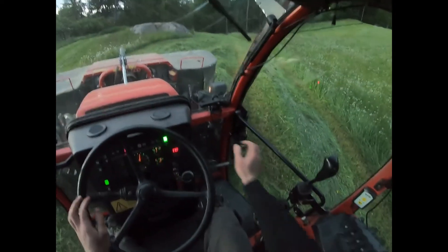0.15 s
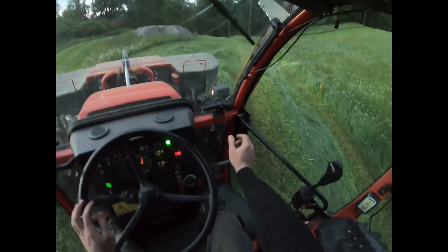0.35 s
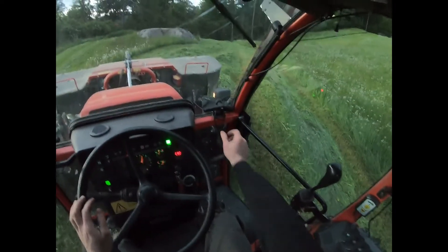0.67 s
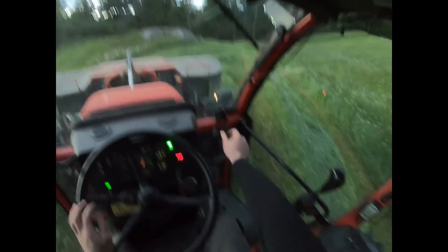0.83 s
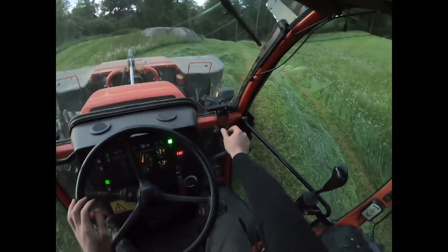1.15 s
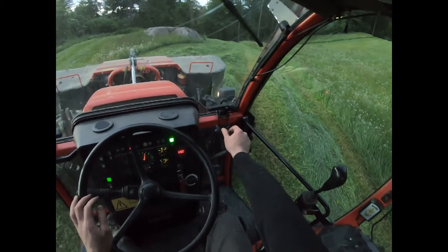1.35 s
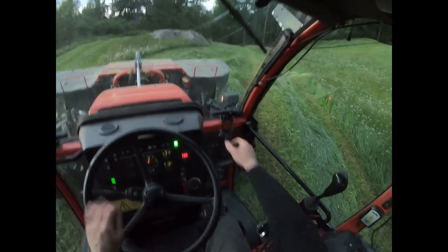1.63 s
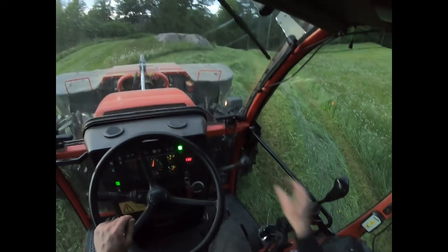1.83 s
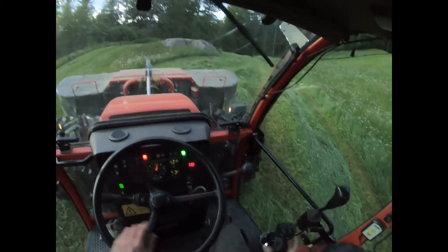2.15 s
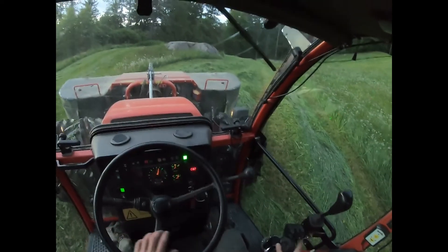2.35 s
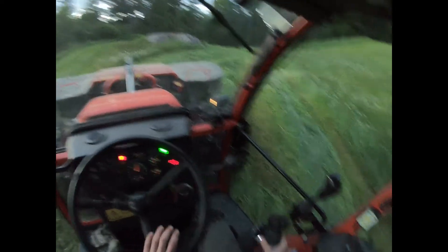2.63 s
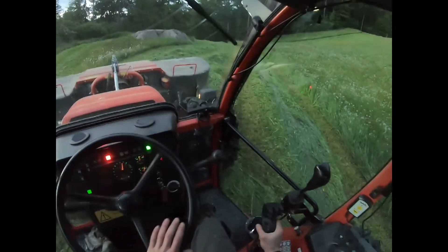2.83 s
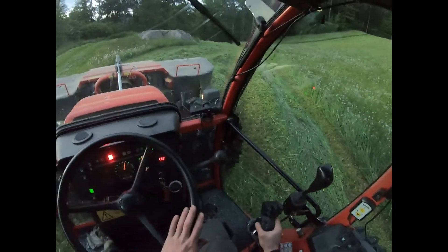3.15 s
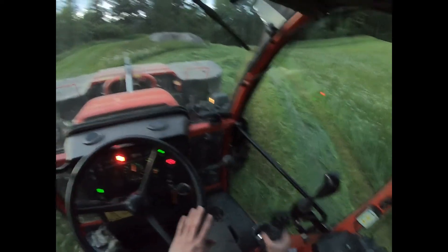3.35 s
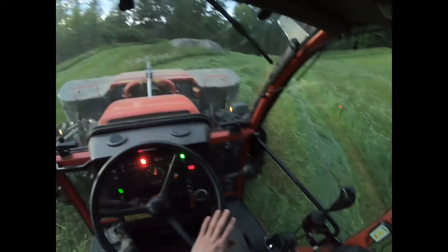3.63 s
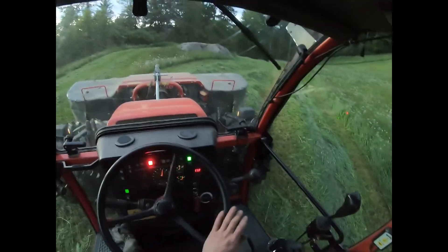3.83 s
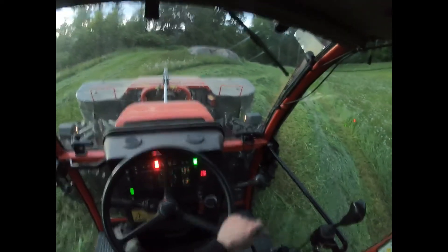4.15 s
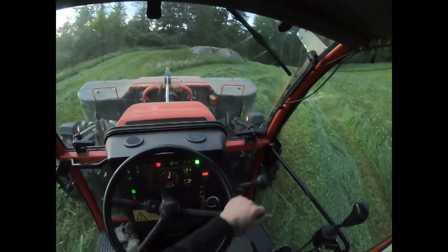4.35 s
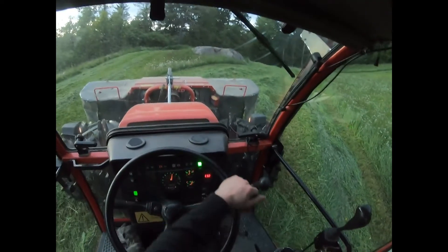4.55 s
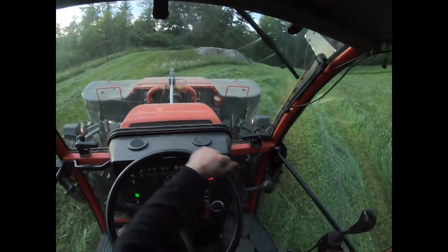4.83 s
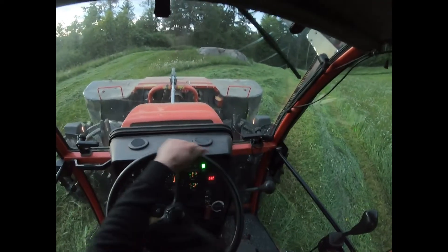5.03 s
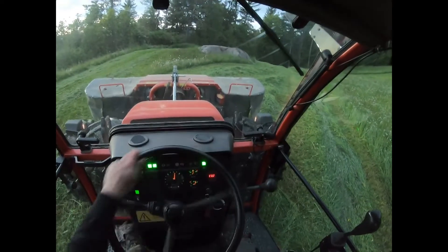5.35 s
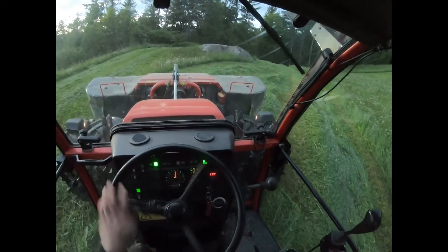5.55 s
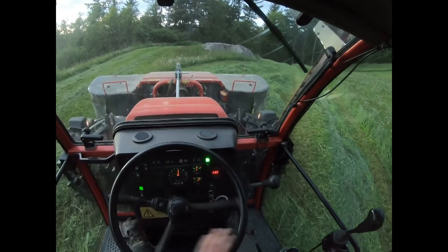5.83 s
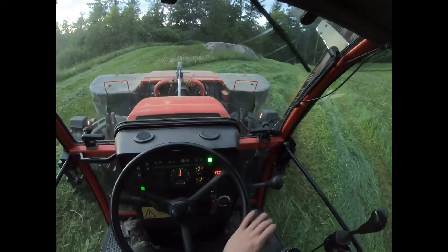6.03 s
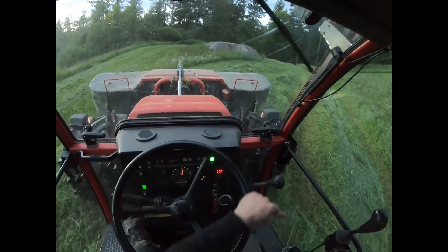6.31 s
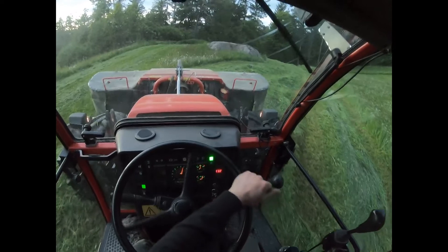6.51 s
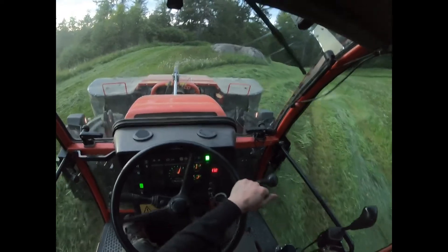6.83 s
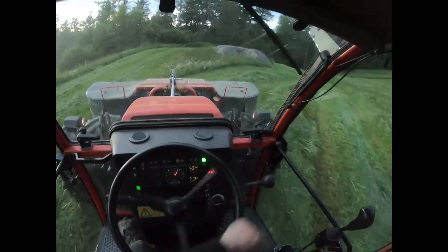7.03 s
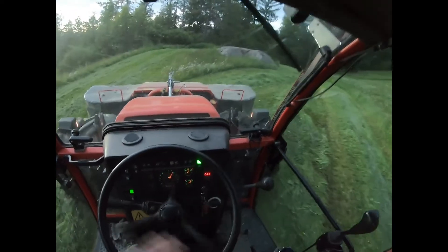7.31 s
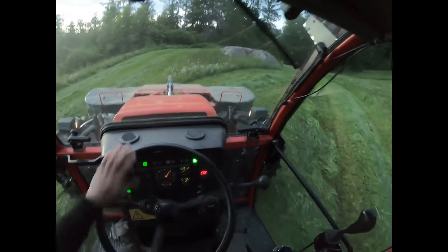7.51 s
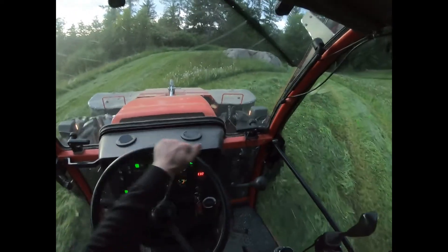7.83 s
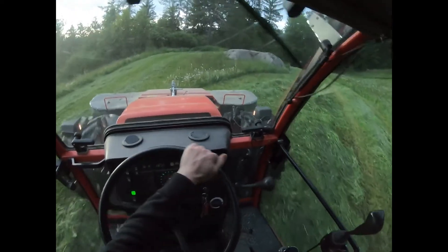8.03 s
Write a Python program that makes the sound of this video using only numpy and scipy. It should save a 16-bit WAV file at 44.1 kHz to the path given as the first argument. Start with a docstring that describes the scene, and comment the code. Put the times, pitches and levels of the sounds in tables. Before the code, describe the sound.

A steady low diesel drone fills an open cab in a grassy field, with noisy mechanical rumble and cab resonance. Short dry lever clicks come first, then thin bursts of hydraulic hiss and light rattling. The engine note dips as it takes load, grows more uneven, then rises steadily to the end. A gear or pump whine climbs with it over buzzing, ringing panels. Near stereo microphones at the driver's position.

```python
"""A four-cylinder diesel tractor heard from the open cab. It idles on a clean exhaust boom at the firing rate,
over noise-like roar and knock that rings the cab modes, while levers clack as short noise scrapes.
Hydraulic valves soon hiss and a panel buzzes, both as dense taps on high modes. Then the engine sags
under load and revs up: the roar brightens, a gear or pump whine slips, catches and climbs, and single
panel modes sing as narrow noise."""
import sys
import numpy as np
from scipy import signal
from scipy.fft import rfft, irfft, next_fast_len
from scipy.io import wavfile
from scipy.ndimage import uniform_filter1d

SR = 44100
rng = np.random.default_rng(int(sys.argv[2]) if len(sys.argv) > 2 else 0)


def voltage_ratio(level):
    """Linear amplitude factor for a level in decibels (scalar or array-like)."""
    return 10 ** (np.asarray(level, float) / 20)


def master_out(mix):
    """Clip the mix to full scale and print it as 16-bit PCM to the path in sys.argv[1]."""
    frames = np.transpose(np.atleast_2d(mix))
    ceiling = np.clip(frames, -1, 1)
    pcm = np.round(ceiling * 32767).astype(np.int16)
    wavfile.write(sys.argv[1], SR, pcm)


N = 360283

# engine effort, the levels being relative: (time [s], roar level [dB], lift of the roar's treble [dB])
EFFORT = [(0, -37, -2), (2, -37.5, -1), (4.8, -37, -0.5), (5.6, -36, 1), (6.2, -35.5, -1.5),
          (6.5, -33.5, 1), (6.9, -34, 4.5), (7.3, -33, 2), (7.7, -33, 2), (7.9, -30.5, -3),
          (8.17, -29.5, -3)]


def evened(x):
    """Scales to rms 1."""
    return x / np.sqrt(np.mean(x ** 2) + 1e-20)


def read(points, hz):
    """Reads a spectrum table on a log-frequency axis."""
    f, value = np.transpose(points)
    return np.interp(np.log(hz + 1), np.log(f + 1), value)


def curves(rows, t):
    """Every column of a table joined by straight lines in time."""
    s, *columns = np.transpose(rows)
    return [np.interp(t, s, c) for c in columns]


def drift(rate):
    """Slow wandering of rms 1: sixteen sines of random phase, the fastest at rate in Hz."""
    t = np.arange(0, N + 256, 256) / SR
    rates = rate * np.geomspace(.05, 1, num=16)
    slow = sum(np.sin(2 * np.pi * (f * t + rng.random())) for f in rates)
    return np.interp(np.arange(N) / SR, t, evened(slow))


def ring(x, modes):
    """Passes x through resonances (Hz, width Hz, peak gain dB) that alternate in sign."""
    size = next_fast_len(x.shape[-1] + 8192)
    hz = np.fft.rfftfreq(size, 1 / SR)
    body = sum((-1) ** k * voltage_ratio(db) / (1 + 2j * (hz - f) / w) for k, (f, w, db) in enumerate(modes))
    return irfft(rfft(x, size) * body, size)[..., :x.shape[-1]]


def dulled(x):
    """Cuts the treble steeply above 10.2 kHz."""
    return signal.sosfilt(signal.butter(8, 10200, fs=SR, output="sos"), x)


def chatter(modes, level_db, per_s, clump_db):
    """Dense tiny taps ringing a few high modes, each of which swells and fades in its own time."""
    tap_db = 3.1 * np.minimum(rng.exponential(1, (2, N)), 4)
    taps = (rng.random((2, N)) < per_s / SR) * voltage_ratio(tap_db)
    taps *= rng.choice([-1., 1.], (2, N))
    rung = 0
    for k, mode in enumerate(modes):
        rung = rung + (-1) ** k * ring(taps, [mode]) * voltage_ratio(clump_db * drift(8))
    return evened(rung) * voltage_ratio(level_db)


def clacks():
    """Each lever catch scrapes as a short swell of noise into the lever's modes."""
    # catches: (time [s], relative level [dB], lean to the first feed [dB], half-width of the swell [s],
    # brightness [dB per octave], favoured pitch [Hz])
    catches = [(0.312, -40, 5, 0.015, -1, 8300), (0.407, -37, -3, 0.023, -4, 9600),
               (0.459, -34, 2, 0.015, -4, 5800), (0.766, -26, 1, 0.015, -2, 8300),
               (1.78, -35, -2, 0.022, -3, 3500), (1.828, -35, -1, 0.017, -3.5, 2400),
               (3.687, -36.5, -3, 0.012, -2, 8300), (3.755, -45, -11, 0.013, 4.5, 7000),
               (4.466, -28, 0.5, 0.02, -7, 3070), (6.507, -37, -9, 0.012, -3, 4000),
               (6.545, -35, -1, 0.02, -1.5, 4000), (7.996, -32, 1, 0.012, -5, 3300)]
    # modes of the lever: (frequency [Hz], width [Hz], gain before brightness and grip [dB])
    lever_modes = [(680, 45, -6.5), (1286, 100, 2), (1925, 210, -4), (2390, 340, -2.5), (3320, 750, -4.5),
                   (5040, 620, -8.5), (5740, 300, -7.5), (6900, 520, -10.5), (8300, 780, -8),
                   (10100, 650, -20)]
    grip_db, grip_octaves = 4, 0.22  # lift and reach around the favoured pitch
    out, t = np.zeros((2, N + 8192)), np.arange(4096) / SR
    for s, level_db, lean_db, half_width, bright_db, favoured_hz in catches:
        swell = np.exp(-((t - .015) / half_width) ** 2)
        scrape = rng.standard_normal((2, 4096)) * swell
        modes = []
        for f, w, db in lever_modes:
            grip = grip_db * np.exp(-(np.log2(f / favoured_hz) / grip_octaves) ** 2)
            modes.append((f, w, db + bright_db * np.log2(f / 3000) + grip))
        gain = voltage_ratio(level_db + 2.5 + np.array([[lean_db], [-lean_db]]) / 2)
        at = round((s - .012) * SR)
        out[:, at:at + 4096] += ring(scrape, modes) * gain
    return dulled(out[:, :N])


def panel_buzz():
    """A loose panel rattles: taps on its modes, louder and softer over time."""
    # modes of the panel: (frequency [Hz], width [Hz], gain [dB])
    panel_modes = [(2230, 68, 0), (2560, 25, -2.5), (3070, 41, 3), (3254, 36, 5.5), (3680, 180, -6),
                   (4280, 170, -5.5), (4660, 30, -8.5)]
    # how loud it buzzes: (time [s], level [dB])
    buzz = [(0, -80), (2.7, -79), (3.2, -65), (3.76, -64.5), (4.75, -75), (5.3, -57), (5.9, -58.5),
            (6.25, -51.5), (6.62, -66), (6.69, -50), (7.1, -54.5), (7.3, -51), (8.17, -51.5)]
    buzz_db, = curves(buzz, np.arange(N) / SR)
    return chatter(panel_modes, buzz_db, per_s=1500, clump_db=4.0)


def singing():
    """Narrow noise at single panel modes, in spells that may overlap, fading in and out."""
    # spells of singing: (start [s], length [s], frequency [Hz], level [dB])
    spells = [(5.1, 0.96, 3297, -59), (6.7, .45, 3060, -54), (6.75, .65, 2560, -55),
              (6.78, .5, 2260, -50.5), (7.3, .45, 3660, -55), (7.45, 0.81, 3260, -53)]
    width_hz, fade_s = 40, .08
    t, out = np.arange(N) / SR, 0
    for start, length, hz, db in spells:
        on = np.clip(np.minimum(t - start, start + length - t) / fade_s, 0, 1)
        mode = [(hz, width_hz, 0)]
        noise = ring(ring(rng.standard_normal((2, N)), mode), mode)
        out = out + on * voltage_ratio(db) * evened(noise)
    return out


def flow_db():
    """Hiss level of the hydraulics: a faint leak, and each valve opening rises, sags and shuts."""
    # valve openings: (start [s], rise [s], length [s], hiss level [dB], sag [dB per s])
    openings = [(2.107, .02, 0.13, -54, 0), (2.25, .05, 1.1, -58, 4.5), (3.2, .3, .95, -56, 0.5),
                (3.72, 0.044, 0.09, -53, 9), (4.597, 0.6, 1.7, -55.5, 0.9), (6.65, 0.027, 1.02, -49, 3.5),
                (7.75, .3, .5, -61, -4)]
    leak_db, close_db_per_s = -70.5, 70
    t, power = np.arange(N) / SR, voltage_ratio(leak_db) ** 2
    for start, rise, length, db, sag_db in openings:
        since = t - start
        fall_db = sag_db * since + close_db_per_s * np.maximum(since - length, 0)
        opening = np.clip(since / rise, 0, 1) * voltage_ratio(db - np.maximum(fall_db, 0))
        power = power + opening ** 2
    return 10 * np.log10(power)


def valve_hiss(hiss_db):
    """Flow through the valves: very dense taps on the valve modes."""
    # modes of the valves: (frequency [Hz], width [Hz], gain [dB])
    valve_modes = [(5600, 120, -9), (6130, 31, -2.5), (6530, 46, 3), (6840, 88, 1.5), (7100, 110, -2),
                   (7550, 150, -3.5), (8180, 51, 0), (8540, 51, -1.5), (9540, 260, -12.5)]
    return dulled(chatter(valve_modes, hiss_db, per_s=3600, clump_db=2.5))


def sizzle(hiss_db):
    """Top modes woken only by strong flow: their level moves 3.2 dB for each dB of hiss."""
    # highest modes: (frequency [Hz], width [Hz], gain [dB])
    top_modes = [(11500, 120, 1.5), (12500, 400, -4.5)]
    return chatter(top_modes, -78.5 + 3.2 * (hiss_db + 53.0), per_s=3000, clump_db=3)


def whine(hz):
    """A gear or pump tone that slips up to speed, catches, hunts in level and climbs with the revs."""
    start_s, climb_s, end_s = 6.64, .21, 8.0
    slipping, engaged = 16, 19  # multiples of the firing rate
    level_db, fade_db_per_s = -44, 149
    hunt_depth_db, hunt_period_s, settle_s = 5.5, 0.41, .35
    t = np.arange(N) / SR
    climb = np.clip((t - start_s) / climb_s, 0, 1)
    multiple = slipping + (engaged - slipping) * climb
    from_catch = np.abs(t - start_s - climb_s)  # the level swings on both sides of the catch
    hunt_db = hunt_depth_db * np.cos(2 * np.pi * from_catch / hunt_period_s) * np.exp(-from_catch / settle_s)
    fade_db = fade_db_per_s * np.maximum(t - end_s, 0)
    db = level_db - 5 * (1 - climb) + hunt_db - fade_db + 1.5 * drift(22)
    phase = 2 * np.pi * np.cumsum(multiple * hz) / SR + .5 * drift(25)
    return np.sqrt(2) * (climb > 0) * voltage_ratio(db) * np.sin(phase)


def roar(turns, load):
    """Fan, block and gear noise: patchy spectra that change colour with load and pulse with each firing."""
    # colour of the roar at idle: (frequency [Hz], relative density [dB])
    idle_colour = [(10, -12), (30, 9.5), (90, 7), (200, 2), (286, 5), (380, -3), (552, -1.5), (848, -4.5),
                   (951, -6), (1070, -10), (1300, -9), (1700, -15.5), (3200, -20), (4400, -28.5),
                   (7000, -32), (9400, -35), (11000, -51.5), (14000, -70)]
    # colour of the roar revved up: (frequency [Hz], relative density [dB])
    load_colour = [(10, -28), (40, 4), (100, 6.5), (191, -3), (311, -0.5), (452, -3), (1300, -11.5),
                   (1550, -16), (2300, -18.5), (3250, -17), (4460, -29), (8360, -29.5), (10500, -40.5),
                   (14000, -64.5)]
    frames, hz = N // 512 + 5, np.fft.rfftfreq(2048, 1 / SR)
    t = np.arange(frames) * 512 / SR
    roar_db, treble_db = curves(EFFORT, t)
    share = np.interp(t, np.arange(N) / SR, load)
    z = rng.standard_normal((frames, 1025, 5)).T
    smooth = uniform_filter1d(z[4], size=20, axis=0)
    patches = evened(uniform_filter1d(smooth, size=5, axis=1))
    idle_db, load_db = read(idle_colour, hz)[:, None], read(load_colour, hz)[:, None]
    colour = voltage_ratio(idle_db * (1 - share) + load_db * share)
    middle = (hz > 300) & (hz < 1500)  # the band the level refers to
    colour /= np.sqrt((colour[middle] ** 2).sum(0))
    upper = 1 / (1 + (1800 / (hz + 1)) ** 4)
    field = colour * voltage_ratio(roar_db + upper[:, None] * treble_db + 0.6 * patches)
    noise = z[:2] + 1j * z[2:4]
    pair = signal.istft(noise * field, nperseg=2048, noverlap=1536)[1][:, :N]
    # once per firing and once per four firings
    pulse = 1 + 0.14 * np.cos(2 * np.pi * turns + 3.3) + 0.096 * np.cos(np.pi * turns / 2)
    return voltage_ratio(1.0) * pair * pulse


def knock(turns, roar_db, pull):
    """One blow per firing, cylinder by cylinder, ringing the cab; pulling makes the cylinders less even."""
    # cab and bonnet modes rung by each combustion: (frequency [Hz], width [Hz], gain [dB])
    cab_modes = [(287, 14, 6), (320.4, 20, 2), (376.6, 12, 4), (444.5, 38, -10.5), (499, 35, -6.5),
                 (556.5, 4.9, -7), (690, 42, -1), (722, 56, -1), (842, 45, -15), (975.4, 35, -10),
                 (1024, 22, -17.5), (1134, 38, -5), (1270, 61, -7.5), (1311, 46, -10), (1475, 19, -16.5),
                 (1768, 170, -15), (1916, 59, -20)]
    # one row per cylinder: blow at full unevenness [dB]
    cylinder_db = [2, -6.5, -5, -4.5]
    uneven_light, uneven_pull = 0.2, 0.62  # 0-1
    level_db = roar_db - 6.5 + 1.5 * pull
    uneven = uneven_light + pull * (uneven_pull - uneven_light)
    at = np.flatnonzero(np.diff(np.floor(turns)))
    db = np.take(cylinder_db, np.arange(len(at)) % 4) * uneven[at]
    db = db + 2.0 * rng.standard_normal(len(at))
    blows = np.zeros(N)
    blows[at] = voltage_ratio(db)
    # a rising sweep draws the blow out over the stroke
    t = np.arange(800) / SR
    spread = signal.chirp(t, 200, t[-1], 2400) * signal.windows.tukey(800, .2)
    drawn_out = signal.oaconvolve(blows, spread)[:N]
    return evened(ring(drawn_out, cab_modes)) * voltage_ratio(level_db)


def exhaust(turns, hz, pull, load):
    """Clean firing harmonics coloured by pipe and cab, and wavering tones between and above them."""
    # exhaust and belt tones, before the pipe:
    # (multiple of firing rate [-], level at light work [dB], level pulling hard [dB], wavering [dB])
    firing_tones = [(1, -13, -13.5, 0.25), (2, -32, -30, 0.45), (2.434, -43.5, -42.5, 1.5),
                    (3, -39.5, -35.5, 0.5), (4, -46, -35.5, 2.5), (5, -51.5, -47, 2), (5.75, -58, -48, 3.5),
                    (6, -49.5, -47, 3.5), (7, -59, -44, 0.5)]
    # further tones between and above the firing harmonics:
    # (multiple of firing rate [-], level idling [dB], level revved up [dB])
    further_tones = [(.43, -47.5, -59), (0.59, -44.5, -41), (1.844, -48.5, -43), (3.58, -50.5, -54.5),
                     (3.69, -48.5, -47.5), (4.864, -49, -44.5), (6.8, -62, -49), (7.26, -56, -66),
                     (7.85, -64.5, -50), (8.56, -53, -44), (9.02, -58.5, -54.5), (9.89, -54.5, -52.5),
                     (10.08, -53, -52.5), (11.73, -47, -50), (13.07, -55, -54), (15.42, -61, -65),
                     (16.02, -56, -59), (17.63, -62.5, -66), (22.1, -55.5, -64), (23.1, -63.5, -69),
                     (16.82, -61.5, -62), (20, -61.5, -61.5), (25.2, -55, -67.5), (35.2, -80.5, -62)]
    # how pipe and cab lift or mute a tone sweeping through their resonances: (frequency [Hz], gain [dB])
    pipe = [(50, -0.64), (80, -2), (110, 9.5), (126, 11.5), (141, 9.5), (152, -2), (164, -2.5), (174, 5.5),
            (194, 4.5), (203, -8.5), (216, -5.5), (228, -2.1), (246, -16), (264, -8.5), (280, 7),
            (298, 2.5), (322, 4.5), (345, -6.5), (365, 0), (388, 3), (412, -2.7), (440, -9.5), (497, 2.5),
            (540, -2)]
    boom = 0
    for k, light_db, hard_db, waver_db in firing_tones:
        db = light_db + pull * (hard_db - light_db) + read(pipe, k * hz) + waver_db * drift(8)
        wander = 0.82 * (k > 4.5) * drift(3)  # radians, upper tones only
        boom = boom + voltage_ratio(db) * np.sin(2 * np.pi * k * turns + wander)
    for k, idle_db, revved_db in further_tones:
        db = idle_db + load * (revved_db - idle_db) + 0.9 * drift(3.7)
        boom = boom + voltage_ratio(db) * np.sin(2 * np.pi * k * turns + drift(3))
    return np.sqrt(2) * boom


def ports(a, b):
    """Two microphone ports from two like sounds: alike in the bass, parting in the treble."""
    # (frequency [Hz], left-right likeness [0-1])
    likeness = [(200, 1), (290, .97), (630, .74), (1380, .5), (3030, .6), (5000, .4), (8000, .4),
                (14500, .5)]
    # (frequency [Hz], phase by which left leads [rad])
    left_lead = [(60, -.12), (400, -.1), (1120, 0), (1380, .3), (2150, -.3), (2840, 0), (5510, -.6),
                 (6200, -.4), (6890, 3.8), (8100, 3.1), (10900, 6.3)]
    # (frequency [Hz], left over right [dB])
    left_tilt = [(60, -.1), (115, -.6), (300, -.5), (600, -.8), (1100, -2.8), (2500, -1.9), (5000, -1.4),
                 (9000, -1.6)]
    hz = np.fft.rfftfreq(N, 1 / SR)
    same = np.clip(read(likeness, hz), 0, 1)
    a, b = rfft(a), rfft(b)
    half = voltage_ratio(read(left_tilt, hz) / 2) * np.exp(.5j * read(left_lead, hz))
    left = a * half
    right = (same * a + np.sqrt(1 - same ** 2) * b) / half
    return irfft(np.array([left, right]), N)


def scene():
    """Levers, panel, hydraulics and engine at the two ports."""
    # speed of the engine: (time [s], firing rate [Hz])
    engine = [(0.0, 57.08), (1.6, 57.33), (2.4, 57.12), (3.0, 56.69), (4.0, 56.71), (4.7, 56.46),
              (5.1, 55.38), (5.5, 54.5), (5.9, 54.69), (6.15, 56.03), (6.4, 57.3), (6.7, 59.4),
              (7.0, 62.28), (7.4, 66.73), (7.8, 69.3), (8.0, 71.6), (8.17, 72.46)]
    pull_start_s, pull_full_s = 4.42, 5.7  # the engine takes up the load between these moments
    t = np.arange(N) / SR
    hz, = curves(engine, t)
    roar_db = curves(EFFORT, t)[0]
    pull = np.clip((t - pull_start_s) / (pull_full_s - pull_start_s), 0, 1)
    load = np.clip((hz - 56) / 14, 0, 1) * (t > 5.5)  # revving up
    turns = np.cumsum(hz * (1 + 0.0021 * drift(15))) / SR  # counts firings
    hiss_db = flow_db()
    pair = clacks() + panel_buzz() + singing()
    pair += valve_hiss(hiss_db) + sizzle(hiss_db)
    pair += roar(turns, load)
    blows = knock(turns, roar_db, pull)
    pair += np.array([blows, np.roll(blows, 90)])  # 2 ms later in the second feed
    pair[0] += exhaust(turns, hz, pull, load) + whine(hz)
    return ports(*pair)


def band_limit(x):
    """A steep low-pass at the top of the band."""
    return signal.sosfilt(signal.butter(12, 15130, fs=SR, output="sos"), x)


def record(dry):
    """Adds the steady hiss of the microphones and a small offset of the converter."""
    self_noise_db = -79
    hissing = dry + voltage_ratio(self_noise_db) * rng.standard_normal(dry.shape)
    return band_limit(hissing - .0028)


dry = scene()
out = record(dry)
master_out(out)
```